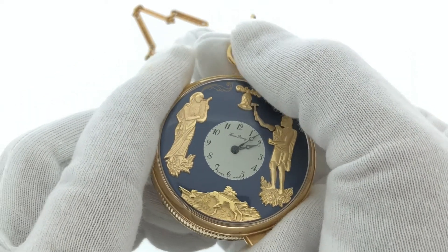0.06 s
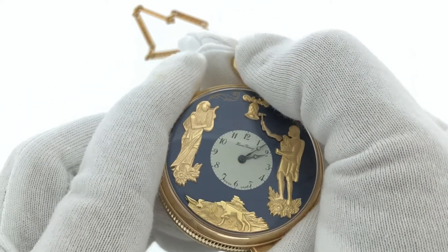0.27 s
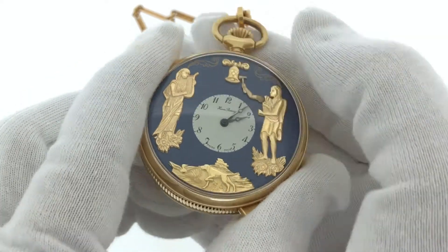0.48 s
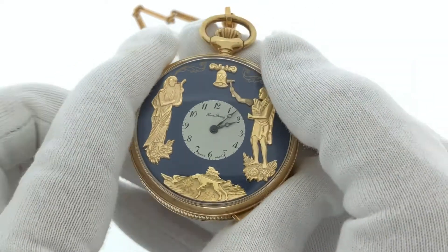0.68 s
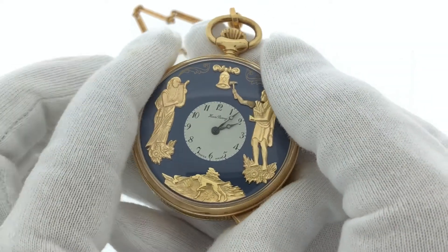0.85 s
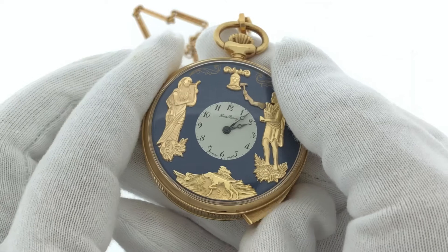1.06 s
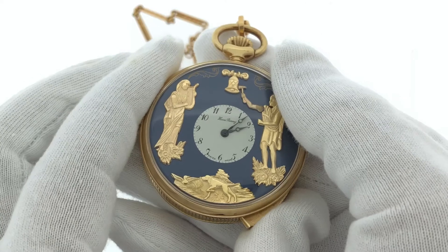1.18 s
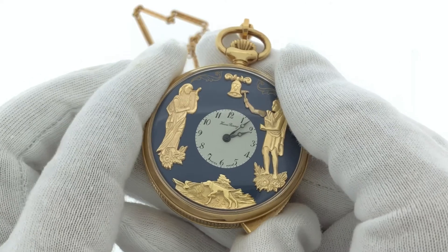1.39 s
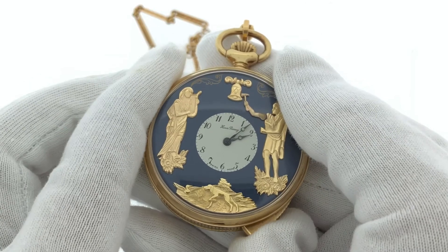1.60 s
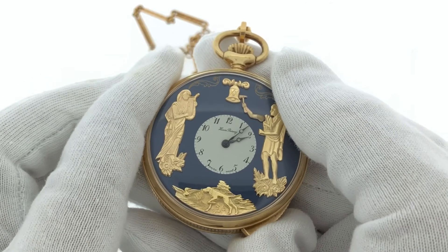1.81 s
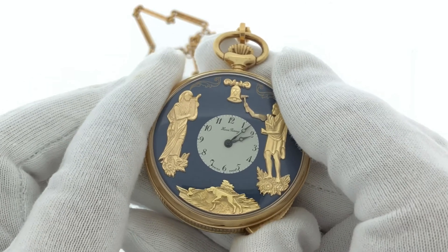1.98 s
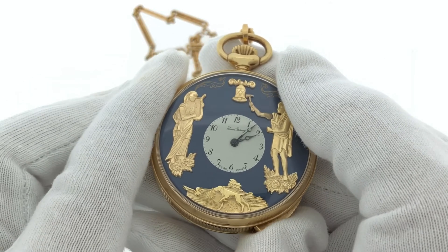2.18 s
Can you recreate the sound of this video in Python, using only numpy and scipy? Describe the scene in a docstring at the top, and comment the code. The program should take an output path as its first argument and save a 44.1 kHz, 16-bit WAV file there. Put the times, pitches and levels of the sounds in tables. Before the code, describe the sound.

Close up in a quiet room, a small watch's catch cracks sharply and rings faintly, a hard knock resonates through the table, gloved hands rustle and bump, a few tiny clicks follow, then only low room rumble.

```python
"""At a table in a quiet room, gloved hands work the slide of a small pocket watch.
The slide snaps: a sharp pressure swing, short noise clicks and a faint ring of case modes.
The hands shift and the watch knocks down on the table: decaying noise bands, table modes and a low boom.
Cotton rubs over the case as grainy noise and lighter clicks follow.
A low rumble with faint steady tones runs throughout."""
import sys
import numpy as np
from scipy import signal
from scipy.io import wavfile

SR = 44100
rng = np.random.default_rng(int(sys.argv[2]) if len(sys.argv) > 2 else 0)


def file_out(sig):
    """Save sig as 16-bit WAV at sys.argv[1]."""
    # one column per channel
    cols = np.atleast_2d(sig).T
    # limit, then scale
    lim = np.clip(cols, -1, 1)
    pcm = np.round(lim * 32767).astype(np.int16)
    wavfile.write(sys.argv[1], SR, pcm)


N = 99225
TIME = np.arange(N) / SR

# clear modes of the table: (frequency [Hz], level per unit impulse [dB], t60 [s])
TABLE_MODES = [(500.7, -46.5, 0.19), (605, -38.5, 0.23), (689.3, -45, 0.37), (775, -41.5, .24),
               (863, -44, .22), (942, -44, .22), (1059, -38.5, 0.15), (1095, -42.5, 0.3),
               (1316, -37.5, .16), (1340, -37.5, .17), (1382, -34.5, 0.13), (1530, -41.5, .15),
               (1603, -41, .15), (1710, -38.5, .15), (1907, -38.5, 0.18), (2037, -40, .12),
               (2460, -34, 0.075), (2735, -30.5, .11), (2710, -33.5, .13), (2823, -35.5, 0.13),
               (3070, -47, .09), (3410, -39.5, .08)]
# lowest modes of the table top: (frequency [Hz], level per unit impulse [dB], t60 [s])
BOOM_MODES = [(107.5, -6.5, .17), (131.3, -0.5, 0.18), (184.3, -6, 0.23), (249.7, -12.5, .18),
              (272.6, -10.5, 0.19)]


def from_db(db):
    """Decibels to amplitude gain."""
    return 10 ** (np.asarray(db) / 20)


def at_hz(points, hz):
    """Interpolate a table on a log-frequency axis."""
    table_hz, values = np.transpose(points)
    return np.interp(np.log(hz), np.log(table_hz), values)


def level(curve):
    """Gain that follows a curve of (time [s], level [dB])."""
    return from_db(np.interp(TIME, *np.transpose(curve)))


def impulses(times_s, sizes):
    """Train of single-sample impulses."""
    out = np.zeros(N)
    index = np.clip(np.asarray(times_s) * SR, 0, N - 1).astype(int)
    np.add.at(out, index, sizes)
    return out


def cut(x, hz, kind):
    """Second-order low- or high-pass."""
    return signal.sosfilt(signal.butter(2, hz, kind, fs=SR, output="sos"), x)


def swing(centre_s, db, hz, width_s):
    """Single pressure swing: a sine under a Gaussian bell."""
    t = TIME - centre_s
    return from_db(db) * np.sin(2 * np.pi * hz * t) * np.exp(-(t / width_s) ** 2 / 2)


def grain(depth_db, points_per_s):
    """Uneven gain of cloth: random dB values joined by straight lines."""
    points = rng.standard_normal(N)
    return from_db(depth_db * np.interp(TIME * points_per_s, np.arange(N), points))


def noise_bands():
    """Third-octave noises of rms 1, with their centres in Hz."""
    edges_hz = 20 * 2 ** (np.arange(30) / 3 + .05)
    white = rng.standard_normal((3, N + SR // 4))  # neighbouring bands use different noises
    bands = []
    for k, pair in enumerate(zip(edges_hz, edges_hz[1:])):
        sos = signal.butter(2, pair, "band", fs=SR, output="sos")
        bands.append(signal.sosfilt(sos, white[k % 3])[-N:])  # drop the filter's start-up
    bands = np.array(bands)
    centres_hz = np.sqrt(edges_hz[1:] * edges_hz[:-1])
    return centres_hz, bands / bands.std(axis=1, keepdims=True)


def shares(colour, hz, tilt_db=0, top_hz=np.inf):
    """Share of the power in each band; a softer contact (lower top_hz) loses the treble."""
    density = from_db(at_hz(colour, hz) + tilt_db * np.log2(hz)) ** 2
    power = hz * density / (1 + (hz / top_hz) ** 8)  # bandwidth grows with hz
    return power / power.sum()


def noise(colour):
    """Coloured noise of about rms 1, summed from weighted bands."""
    hz, bands = noise_bands()
    return np.sqrt(shares(colour, hz)) @ bands


def ring(force, modes):
    """Each mode answers a unit impulse with a dying sine; table neighbours alternate in sign."""
    out = np.zeros(N)
    for k, (hz, db, t60_s) in enumerate(modes):
        r = from_db(-60 / (t60_s * SR))
        w = 2 * np.pi * hz / SR
        mode = signal.lfilter([0, np.sin(w)], [1, -2 * r * np.cos(w), r * r], force + 1e-18)
        out += (-1) ** k * from_db(db) * mode
    return out


def dense_ring(hits, colour, decay):
    """Modes too many to tell apart: every hit feeds energy into each band, where it dies away."""
    hz, bands = noise_bands()
    times_s = [hit[0] for hit in hits]
    energy = np.array([from_db(db) ** 2 * shares(colour, hz, tilt_db, top_hz)
                       for _, db, tilt_db, top_hz in hits])
    out = np.zeros(N)
    for centre_hz, band, fed in zip(hz, bands, energy.T):
        keep = from_db(-120 / (at_hz(decay, centre_hz) * SR))  # energy factor per sample
        stored = signal.lfilter([1], [1, -keep], impulses(times_s, fed) + 1e-20)
        out += band * np.sqrt(stored)
    return out


def room():
    """Steady coloured noise, strongest in the bass, plus faint constant sines."""
    # room noise: (frequency [Hz], relative density [dB per Hz])
    room_colour = [(15, -21), (25, -13.5), (59, -2.5), (157, -6.5), (190, -13), (405, -18.5), (451, -21.5),
                   (659, -23.5), (1400, -28.5), (2000, -29.5), (2280, -30), (8360, -35), (16000, -41.5)]
    # steady tones: (frequency [Hz], level [dB rms])
    tones = [(59.2, -84), (96.9, -84.5), (1077, -94), (2051, -89)]
    room_db = -65.5
    hum = np.zeros(N)
    for hz, db in tones:
        hum += np.sqrt(2) * from_db(db) * np.sin(2 * np.pi * (hz * TIME + rng.random()))
    return from_db(room_db) * noise(room_colour) + hum


def gloves():
    """Cloth on metal hisses as grainy noise; a dull drag force also stirs the table's modes."""
    # cotton sliding over the case, before grain: (time [s], level [dB])
    rub = [(0, -76.5), (.12, -76), (.21, -71.5), (.36, -71), (.42, -63.5), (.48, -66), (.6, -64),
           (.65, -62), (.7, -57.5), (.76, -65), (.81, -64), (.88, -73.5), (.97, -71.5), (1.05, -69.5),
           (1.2, -77.5), (2.25, -79)]
    # rub noise: (frequency [Hz], relative density [dB per Hz])
    rub_colour = [(300, -2.5), (1500, 2), (3500, -1), (6000, 2.5), (9000, -2.5), (12500, -4.5),
                  (16000, -11)]
    # hands dragging on the table, before grain: (time [s], level [dB])
    drag = [(0, -66.5), (.1, -89), (.25, -66), (.37, -76.5), (.41, -50), (.445, -61), (.48, -60.5),
            (.56, -49), (.63, -53.5), (.7, -59.5), (.77, -61.5), (.8, -54.5), (.87, -63), (.93, -62.5),
            (1.0, -74), (1.2, -79.5), (2.25, -90.5)]
    # drag noise: (frequency [Hz], relative density [dB per Hz])
    drag_colour = [(25, -31), (50, -18), (85, -11), (130, 7), (250, -1), (400, -12), (650, -10.5),
                   (1000, -13), (1600, -16), (2700, -14), (4000, -29.5), (12000, -42.5)]
    table_gain_db, boom_gain_db, force_lowpass_hz = 5.5, -28, 612

    hiss = level(rub) * grain(depth_db=2, points_per_s=520) * noise(rub_colour)
    pressure = level(drag) * grain(depth_db=2, points_per_s=100)
    force = cut(pressure * rng.standard_normal(N), force_lowpass_hz, "low")
    table = from_db(table_gain_db) * ring(force, TABLE_MODES)
    boom = from_db(boom_gain_db) * ring(force, BOOM_MODES)
    return hiss + pressure * noise(drag_colour) + table + boom


def bumps():
    """Padded pushes of the hands drive the table top's lowest modes; the landing ends in a thud."""
    # soft pushes: (time [s], impulse [dB], push length [s])
    pushes = [(.001, -54, 0.0044), (.207, -52.5, 0.0042), (.232, -44.5, 0.0038), (0.285, -62, 0.0038),
              (.406, -34.5, 0.0058), (0.463, -36, 0.0033), (0.498, -35, 0.0028), (0.5063, -31, 0.0023),
              (.561, -40, 0.0027), (.607, -62, 0.0054), (.68, -51, 0.0033), (.812, -43.5, 0.0049),
              (.851, -38, 0.0044), (0.8736, -45, 0.0054)]
    boom_low_hz = 70.5  # the table top radiates little below this
    force = np.zeros(N)
    for start_s, db, length_s in pushes:
        push = np.sin(np.pi * np.clip((TIME - start_s) / length_s, 0, 1)) ** 2
        force += from_db(db) * push / push.sum()
    # the weight of the hands comes down
    thud = swing(centre_s=.51, db=-24, hz=139, width_s=0.0026)
    return cut(ring(force, BOOM_MODES) - thud, boom_low_hz, "high")


def watch():
    """Short metallic noise clicks; the catch lets go with a sharp crack and rings the case modes."""
    # slide and case clicks: (time [s], level [dB], brightness [dB per octave], treble limit [Hz])
    clicks = [(.096, -59, 3.5, 7440), (.139, -62.5, -1.5, 11000), (.2308, -31, 0, 16000),
              (.232, -31, .5, 14000), (.3803, -49, 3, 16000), (.4275, -60, 3, 13000),
              (.565, -57, 3.5, 18000), (.712, -60, 7, 14000), (.7474, -55.5, -2, 14000),
              (.813, -70, 3, 18000), (.9113, -44, 7, 10000), (.9148, -46.5, 4, 12000),
              (.928, -50.5, 2.5, 9000), (.9328, -44, -1.5, 13000), (.936, -47, 10, 17000),
              (.9545, -56.5, 6, 12000), (1.4184, -66.5, 2, 12000), (1.5571, -69.5, 7, 12000)]
    # click spectrum: (frequency [Hz], relative density [dB per Hz])
    click_colour = [(100, -10), (400, -12), (900, -7.5), (1400, -6), (2000, 5), (3700, 0), (4900, -1),
                    (6800, 3), (9000, -3.5), (12000, -4), (15500, -20)]
    # click decay: (frequency [Hz], t60 [s])
    click_decay = [(300, 0.063), (2000, 0.039), (7000, 0.034), (15000, 0.027)]
    # case, long faint ring then short bright modes: (frequency [Hz], level [dB], t60 [s])
    case_modes = [(689, -60, .3), (3015, -66, 1.1), (3871, -62, .65), (3924, -73, .7), (5367, -71, .65),
                  (1745, -39, .04), (2175, -39, .035), (3740, -39, .036), (5560, -40, .03),
                  (6100, -42, .03), (7305, -41, .035), (9645, -43, .028), (12320, -46, .03)]
    snap_s = .23198
    crack = swing(snap_s, db=-27, hz=3870, width_s=0.000065)
    case = ring(impulses([snap_s], 1), case_modes)
    return dense_ring(clicks, click_colour, click_decay) + crack + case


def knocks():
    """Contacts feed dense decaying bands, the landing rings the table, single modes give hollow tocks."""
    # table knocks: (time [s], level [dB], brightness [dB per octave], treble limit [Hz])
    hits = [(.162, -66, -3.5, 6000), (.384, -58, -3, 6000), (.3995, -54, -2.5, 9000), (.458, -52, -6, 3000),
            (.465, -52.5, -5, 3000), (.4918, -28, -2.5, 12000), (.4957, -26.5, 3, 13000),
            (.4988, -52, 2, 10000), (.5088, -35.5, 1.5, 4500), (.5153, -33, -0.5, 9000),
            (.521, -32, -0.5, 4500), (.6212, -54, -1, 6000), (.79, -56.5, -4.5, 5000), (.797, -58, 4, 5000),
            (.933, -58.5, -5, 4000), (1.953, -62.5, -7, 4000)]
    # knock spectrum: (frequency [Hz], relative density [dB per Hz])
    knock_colour = [(30, -32), (70, -16.5), (200, -6.5), (400, -8), (700, -6.5), (1400, 2.5), (2100, -1.5),
                    (2900, 0.5), (4000, -13), (6300, -6.5), (8500, -12), (10500, -33.5), (12500, -26),
                    (15500, -52.5)]
    # knock decay: (frequency [Hz], t60 [s])
    knock_decay = [(100, 0.32), (600, 0.19), (1400, 0.081), (2700, 0.062), (4500, 0.059), (8000, 0.043),
                   (15000, .045)]
    # hollow tocks as the case settles: (time [s], level [dB], pitch [Hz])
    tock_table = [(0.387, -49, 698), (0.4572, -46, 430), (.464, -42, 617), (0.47, -50, 956),
                  (.556, -42.5, 1643), (.621, -48.5, 636), (.797, -52.5, 1440), (0.9329, -53, 1098)]
    landing_s, tock_t60_s = .492, 0.067
    tocks = np.zeros(N)
    for time_s, db, hz in tock_table:
        tocks += ring(impulses([time_s], 1), [(hz, db, tock_t60_s)])
    table = ring(impulses([landing_s], 1), TABLE_MODES)
    return dense_ring(hits, knock_colour, knock_decay) + table + tocks


def scene():
    """Sum of all sources in one channel."""
    return (room() + gloves() + bumps() + watch() + knocks())[None]


def record(dry):
    """Steep elliptic low-pass cuts the top."""
    cutoff_hz = 15900
    sos = signal.ellip(10, .1, 80, cutoff_hz, fs=SR, output="sos")  # ripple, stopband [dB]
    return signal.sosfilt(sos, dry)


dry = scene()
out = record(dry)
file_out(out)
```